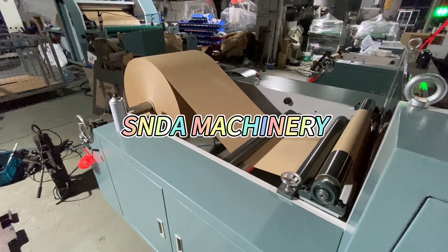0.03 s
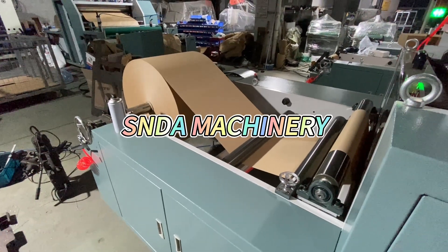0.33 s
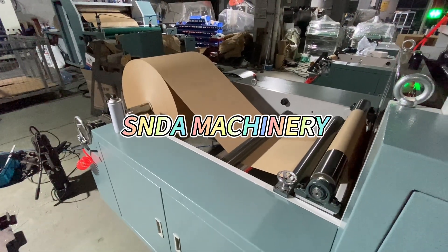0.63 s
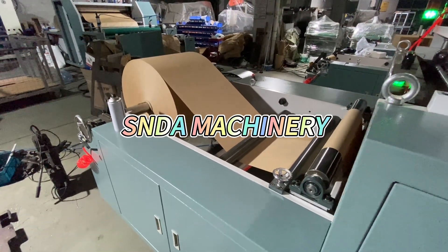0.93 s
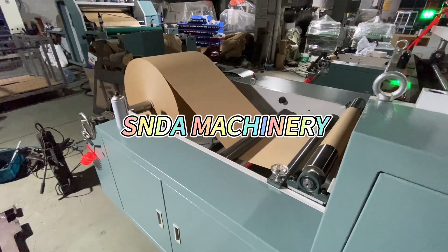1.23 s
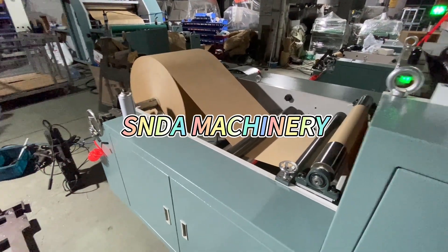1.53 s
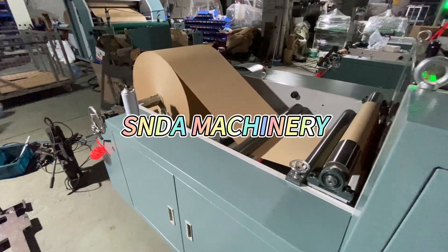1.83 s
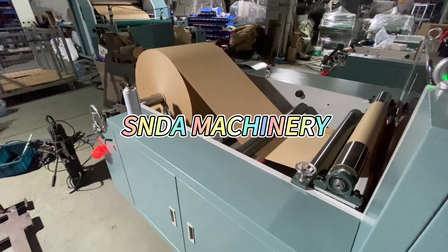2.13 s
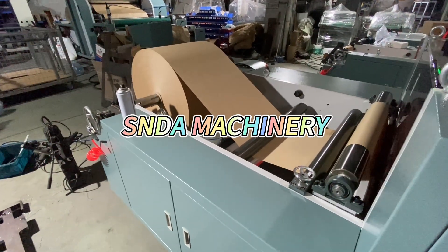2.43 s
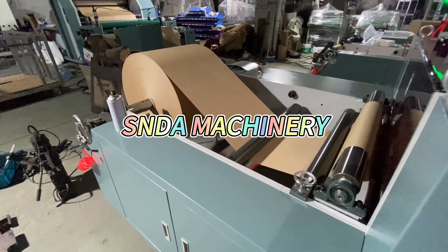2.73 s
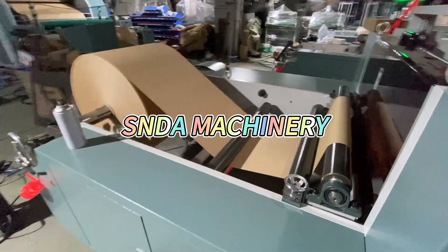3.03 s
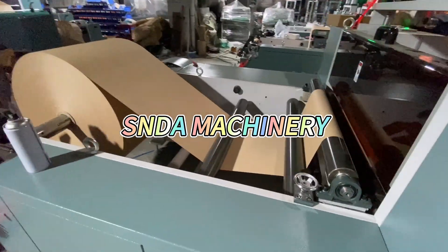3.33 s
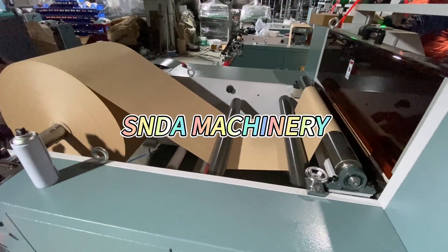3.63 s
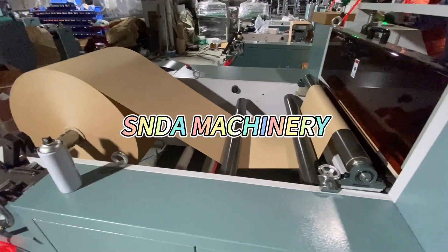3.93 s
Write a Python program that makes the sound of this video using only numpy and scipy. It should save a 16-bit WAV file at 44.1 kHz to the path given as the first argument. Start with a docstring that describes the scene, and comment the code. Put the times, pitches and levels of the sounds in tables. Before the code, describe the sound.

A paper-feeding machine runs loudly in a workshop, gears humming over a rhythmic swish.

```python
"""Gears sing over a broad roar, swelling with each roller turn of a paper-converting machine.
Their meshing teeth sound a harmonic series, and a tight spot on the roller rings two short notes.
The paper web hisses and swishes, the drive hums and its inverter whines. Early on something bumps
dully amid a low rumble; towards the end the listener moves closer and a sideband, beating against
the second gear harmonic, makes it throb at the motor's rate."""
import sys
import numpy as np
from scipy import signal
from scipy.fft import rfft, irfft
from scipy.io import wavfile

SR = 44100
rng = np.random.default_rng(int(sys.argv[2]) if len(sys.argv) > 2 else 0)


def file_out(sig):
    """Save sig as 16-bit WAV at sys.argv[1]."""
    # one column per channel
    cols = np.atleast_2d(sig).T
    # limit, then scale
    lim = np.clip(cols, -1, 1)
    pcm = np.round(lim * 32767).astype(np.int16)
    wavfile.write(sys.argv[1], SR, pcm)


N = 176400
T = np.arange(N) / SR
MESH_HZ, MOTOR_HZ = 281.85, 27.3

# Mesh harmonics. Each row: harmonic number, base level in dB, left-right balance in dB,
# right-ear lag in radians, base swell in dB, time of one swell in seconds, roughness from 0 to 1.
MESH_HARMONICS = [(2, -27.2, -0.5, -1.25, 2.6, 0.1, 0.25), (3, -40, -10, -2.9, -5.5, .2, 0.82),
                  (4, -33.3, 6, -1.2, 0.5, 0.13, 0.35), (5, -41.5, 0, -1.2, 5, 0.037, 0.5),
                  (6, -39, 2, -1.2, 1.2, 0.046, 0.45), (7, -42, 0, 1.6, 3, 0.162, 0.9),
                  (8, -45.5, -32, 2.5, 4, 0.115, 0.84), (10, -50, 8, 2, 0.5, .15, 0.7)]
# Gains of harmonics four and six along the walk. Each row: time in seconds, gain in dB.
FOURTH_GAIN = [(0, -3), (1.3, -4), (1.44, 7), (1.56, 0), (1.7, 9.5), (1.8, 1), (2, 9.5), (2.22, 1),
               (2.36, 9), (2.46, 0), (4, -3)]
SIXTH_GAIN = [(0, -1), (.6, -1), (1.2, -3), (2.05, 3), (2.35, 4), (2.95, -3), (3.06, 6), (3.3, -4), (4, 0)]
# The sideband's level and left-right balance. Each row: time in seconds, value in dB.
SIDEBAND_LEVEL = [(0, -28.5), (.7, -30.5), (1.3, -35), (1.9, -32.5), (2.6, -26.5), (3.3, -24.5),
                  (3.8, -22.5), (4, -20.5)]
SIDEBAND_PAN = [(0, 5), (1.5, -4.5), (2.8, 8), (3.4, 2), (3.9, 12)]
def gears():
    """Modulation: each turn varies the harmonics' level and phase; a sideband beats with the second."""
    throb_db, throb_pan_db = in_time(SIDEBAND_LEVEL), in_time(SIDEBAND_PAN)
    nearer_db = throb_db - throb_db.mean()
    sideband_db = throb_db + 1.5 * np.cos(roller_angle(zero_s=.052))
    out = tone(2 * MESH_HZ - MOTOR_HZ, sideband_db, throb_pan_db, rough=.15, lag=-1.6)
    walk_db = {2: .28 * nearer_db, 4: in_time(FOURTH_GAIN), 6: in_time(SIXTH_GAIN)}
    for multiple, db, pan_db, lag, swell_db, swell_s, rough in MESH_HARMONICS:
        k, angle = round(multiple), roller_angle(swell_s)
        if k == 2:  # moves with the sideband and swells less where that is loud
            pan_db = pan_db + throb_pan_db / 2
            swell_db = swell_db * np.exp(-.17 * nearer_db)
        level_db = db + walk_db.get(k, 0) + swell_db * np.cos(angle)
        out = out + tone(k * MESH_HZ, level_db, pan_db, rough, lag, wobble=-.18 * k * np.sin(angle))
    return out


# Roller turns. Each row: time in seconds, levels of the lower and upper ring in dB, swish gain in dB.
ROLLER_TURNS = [(.17, -28, -24.5, -1.5), (.44, -23, -29, -5.5), (.71, -22.5, -34, -4.5),
                (.975, -24.5, -38, -11), (1.23, -36, -38, -14), (1.48, -40, -38, -7), (1.74, -31, -28, -3),
                (1.99, -31, -24, -1), (2.24, -30, -24, -1), (2.511, -27, -26.5, -2), (2.78, -25, -28, -5),
                (3.03, -25, -34, -7), (3.28, -28, -38, -7), (3.54, -33, -38, -11), (3.81, -27, -32, -5)]
# The two rings. Each row: frequency in Hz, left-right balance in dB, right-ear lag in radians,
# roughness from 0 to 1.
RING_TONES = [(857.3, 4, 1.35, 0.16), (1127, 7, -3, .3)]
def tight_spot(width_s=.021):
    """Periodic excitation: once a turn, the roller's tight spot briefly rings two gear tones."""
    envelopes = sum(from_db([[lower_db], [upper_db]]) * gaussian(s, width_s)
                    for s, lower_db, upper_db, _ in ROLLER_TURNS)
    return sum(envelope * tone(hz, 0, pan_db, rough, lag)
               for envelope, (hz, pan_db, lag, rough) in zip(envelopes, RING_TONES))


# Hum of the motor and of the frame. Each row: time in seconds, level in dB.
MOTOR_LEVEL = [(0, -29.5), (1.4, -30), (1.74, -32.5), (1.9, -30), (2.8, -29), (2.96, -35), (3.04, -26.5),
               (3.14, -32), (3.42, -30.5), (3.55, -33), (4, -33.5)]
FRAME_LEVEL = [(.1, -40.5), (.45, -34), (1, -38), (1.35, -42.5), (1.6, -39.5), (2.1, -32.5), (2.6, -43),
               (2.8, -34.5), (3.65, -34.5), (3.8, -51)]
# Weaker hums and the inverter's whine. Each row: frequency in Hz, level in dB,
# left-right balance in dB, roughness from 0 to 1.
DRIVE_TONES = [(82.4, -49.5, -0.5, 0.4), (197.3, -42.5, 5, 0.4), (251, -45, 0, 0.46),
               (268, -43.5, -7, 0.17), (278.9, -43.5, -5, 0.35), (398.5, -44, 2, 0.67),
               (426.5, -44, -26, 0.07), (663.2, -37, -3, 0.84), (1078, -40, -3, 0.64),
               (1394, -41, -1, 0.73), (1518, -46.5, 1, 0.73)]
INVERTER_TONES = [(7607, -57, 2, .55), (8000, -56.5, -1, .55), (8393, -62, -2, .55)]
def drive():
    """Forced vibration: motor and frame hum at steady pitches, and the inverter whines high above."""
    motor = tone(285.3, in_time(MOTOR_LEVEL), pan_db=-4.6, rough=.15)
    frame = tone(165, in_time(FRAME_LEVEL), pan_db=-3.5, rough=.075)
    return motor + frame + sum(tone(*row) for row in DRIVE_TONES + INVERTER_TONES)


# Spectrum of the roar. Each row: frequency in Hz, density in dB per Hz.
ROAR_SPECTRUM = [(22, -98), (40, -88), (55, -65), (80, -60.5), (98, -66.5), (125, -64.5), (155, -56.5),
                 (195, -60.5), (215, -60), (265, -56.5), (340, -62), (420, -57.5), (500, -57.5),
                 (660, -54.5), (760, -59.5), (830, -52), (930, -58.5), (1080, -53), (1230, -60),
                 (1450, -59), (1850, -64.5), (2750, -68), (4200, -77.5), (9000, -103)]
def roar(flutter_db=1.17):
    """Incoherent addition: bearings, belts and fans blur into one broad noise in the hall."""
    return room_noise(ROAR_SPECTRUM) * from_db(flutter_db * drift(16))


# Spectra of the web's hiss and swish. Each row: frequency in Hz, base density in dB per Hz.
HISS_SPECTRUM = [(1000, -71.5), (2700, -71), (4200, -72.5), (5700, -72.5), (7200, -77.5), (10000, -77.5),
                 (11800, -82.5), (14000, -86.5), (15000, -92)]
SWISH_SPECTRUM = [(800, -77), (1900, -61), (2800, -66), (4200, -69.5), (5800, -67.5), (7500, -77.5),
                  (11000, -75.5), (15000, -88)]
# Course of the hiss. Each row: time in seconds, gain in dB.
HISS_GAIN = [(0, -1.5), (.6, 0), (1.3, -.7), (2.4, -.3), (2.84, 2), (2.98, .6), (3.1, 2.6), (3.25, .8),
             (3.37, 3), (3.52, 1), (4, 2)]
def paper(flutter_db=.45, attack_s=.028, release_s=.05):
    """Friction noise: the running web hisses, and swishes over the roller as it turns."""
    hiss = room_noise(HISS_SPECTRUM) * from_db(in_time(HISS_GAIN) + flutter_db * drift(5.6))
    strokes = sum(from_db(db) * gaussian(s, np.where(T < s, attack_s, release_s))
                  for s, _, _, db in ROLLER_TURNS)
    return hiss + strokes * room_noise(SWISH_SPECTRUM)


# Dull knocks. Each row: start in seconds, level in dB, frequency in Hz, 60 dB decay time in seconds.
KNOCKS = [(.665, -27, 66, .25), (.766, -12, 195, .075)]
def bumps(contact_s=.003):
    """Damped oscillation: each soft knock starts one low mode that decays exponentially."""
    out = 0
    for start, db, hz, t60 in KNOCKS:
        age = np.maximum(T - start, 0)
        attack = 1 - np.exp(-age / contact_s)
        decay = np.exp(-np.log(1000) * age / t60)
        out = out + from_db(db) * attack * decay * np.sin(2 * np.pi * hz * age)
    return out


# Spectrum of the rumble at its height. Each row: frequency in Hz, density in dB per Hz.
RUMBLE_SPECTRUM = [(25, -100), (45, -71), (65, -54.5), (100, -59), (200, -56.5), (300, -55.5), (600, -81),
                   (2000, -130)]
def rumble():
    """Amplitude envelope: low noise rises and dies away around the bumps."""
    return room_noise(RUMBLE_SPECTRUM) * gaussian(.87, width_s=.31)


# Likeness of the two ears. Each row: frequency in Hz, correlation from -1 to 1.
EAR_CORRELATION = [(30, .95), (300, .92), (420, .6), (560, .1), (1500, 0), (3000, -.2), (4300, .2),
                   (5800, .2), (7500, -.15), (10000, .4), (11500, -.2)]
# Lean of the noise. Each row: frequency in Hz, left-right balance in dB.
NOISE_BALANCE = [(50, 0), (280, -4), (450, 9), (650, 7), (1100, 0), (2200, -0.1), (4200, 0.5), (6800, 4),
                 (8200, -1), (9700, -3), (11500, 0)]
def room_noise(spectrum):
    """Diffuse field: noise of the given density reaches the ears alike in the bass, less so above."""
    hz = np.arange(N // 2 + 1) * SR / N
    mid, side = rfft(rng.standard_normal((2, N)))
    alike = at_hz(EAR_CORRELATION, hz)
    pair = np.sqrt(1 + alike) * mid + np.sqrt(1 - alike) * side * [[1], [-1]]
    gains = panned(at_hz(NOISE_BALANCE, hz)) * from_db(at_hz(spectrum, hz))
    return irfft(pair * gains, N) * np.sqrt(SR) / 2


def tone(hz, db, pan_db, rough, lag=0, wobble=0):
    """Interference: a direct tone adds to a wandering rough share that the room scatters."""
    alike = np.clip(at_hz(EAR_CORRELATION, hz), 0, 1)
    shared, left, right = [(drift(11) + 1j * drift(11)) / np.sqrt(2) for _ in range(3)]
    scatter = np.sqrt(alike) * shared + np.sqrt(1 - alike) * np.array([left, right])
    amplitude = np.sqrt(1 - rough ** 2) + rough * scatter
    phase = 2 * np.pi * (hz * T + rng.random()) + wobble - np.array([[0], [lag]])
    return np.sqrt(2) * from_db(db) * panned(pan_db) * (amplitude * np.exp(1j * phase)).real


def roller_angle(zero_s):
    """Phase of rotation in radians: one cycle per roller turn, zero near the given time."""
    times = np.array(ROLLER_TURNS)[:, 0]
    period = np.diff(times).mean()
    padded_times = [times[0] - 2 * period, *times, times[-1] + 2 * period]
    turns = np.interp(T, padded_times, [-2, *range(len(times)), len(times) + 1])
    return 2 * np.pi * (turns - (zero_s - times[0]) / period)


def drift(corner_hz):
    """Low-pass noise: a slow random wander with a standard deviation of 1."""
    step, settle = 40, 2000  # audio samples per slow sample; slow samples for the filter to settle
    pole = np.exp(-2 * np.pi * corner_hz * step / SR)
    white = rng.standard_normal(N // step + settle + 2)
    slow = signal.lfilter([1], [1, -2 * pole, pole * pole], white)[settle:]
    return np.interp(np.arange(N) / step, np.arange(len(slow)), slow / slow.std())


def panned(pan_db):
    """Constant-power panning: left and right gains that differ by pan_db."""
    gains = from_db(np.array([[.5], [-.5]]) * pan_db)
    return gains / np.sqrt(np.mean(gains ** 2, axis=0))


def gaussian(peak_s, width_s):
    """Gaussian envelope with a peak of 1."""
    return np.exp(-((T - peak_s) / width_s) ** 2 / 2)


def from_db(db):
    """Amplitude ratio from decibels."""
    return 10 ** (np.asarray(db) / 20)


def in_time(rows):
    """Linear interpolation over time."""
    return np.interp(T, *np.transpose(rows))


def at_hz(points, hz):
    """Interpolation on a log-frequency axis."""
    frequencies, values = np.transpose(points)
    return np.interp(np.log(np.maximum(hz, 1)), np.log(frequencies), values)


def scene():
    """Superposition: the pressures of all the sources add."""
    return gears() + tight_spot() + drive() + roar() + paper() + rumble() + bumps()


def record(dry, low_cut_hz=38, high_cut_hz=16000):
    """Band limiting: the deepest bass is removed, and the top is cut steeply."""
    dry = signal.sosfilt(signal.butter(4, low_cut_hz, "high", fs=SR, output="sos"), dry)
    return signal.sosfilt(signal.cheby2(16, 70, high_cut_hz, fs=SR, output="sos"), dry)


dry = scene()
out = record(dry)
file_out(out)
```